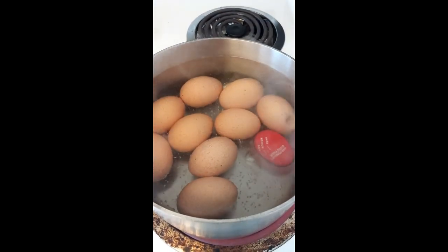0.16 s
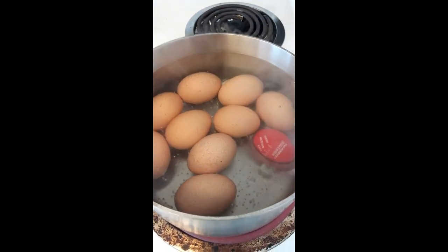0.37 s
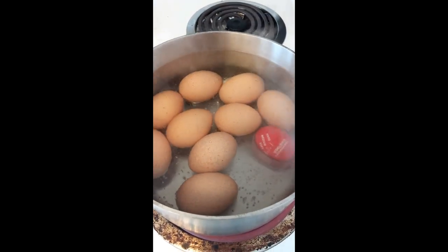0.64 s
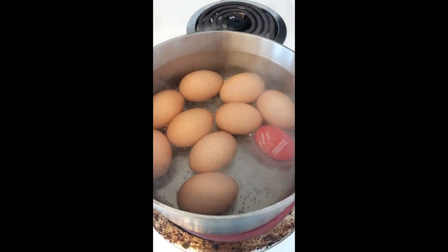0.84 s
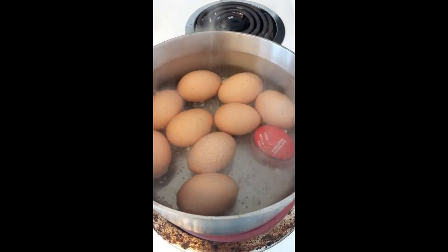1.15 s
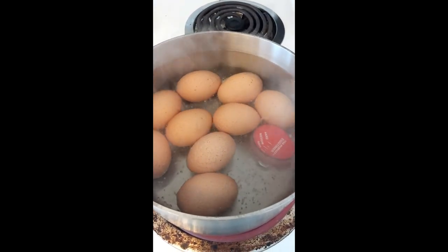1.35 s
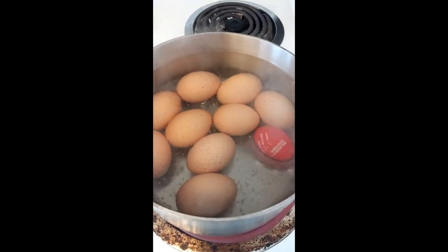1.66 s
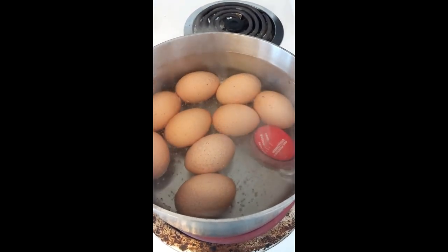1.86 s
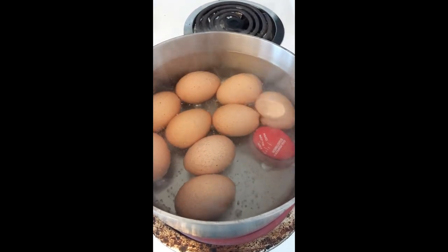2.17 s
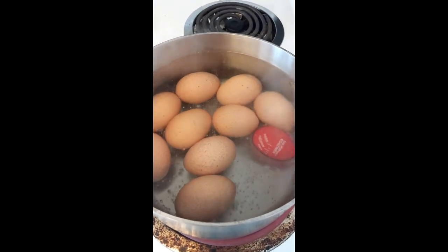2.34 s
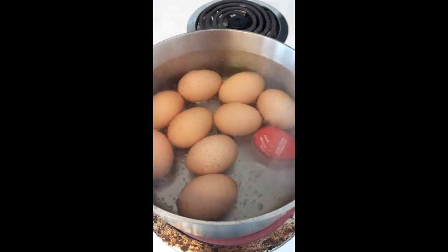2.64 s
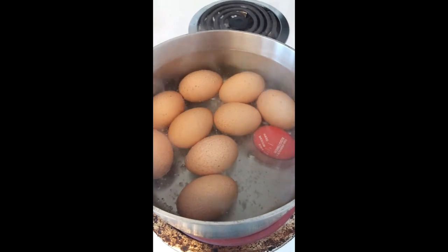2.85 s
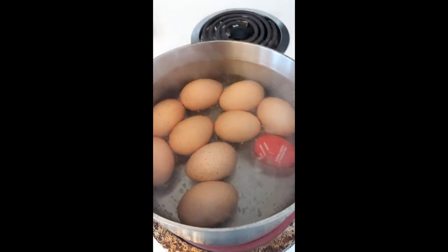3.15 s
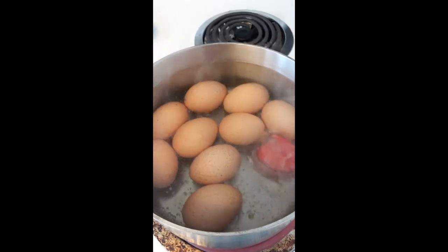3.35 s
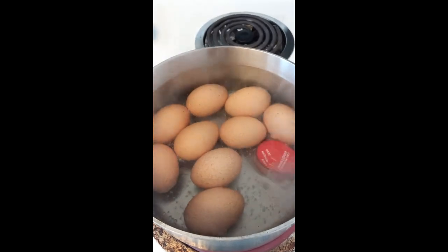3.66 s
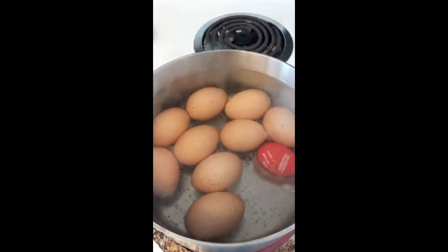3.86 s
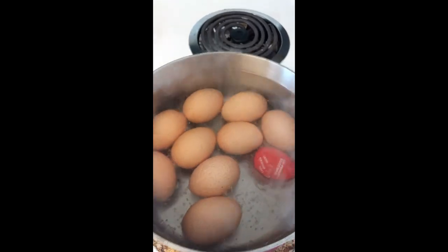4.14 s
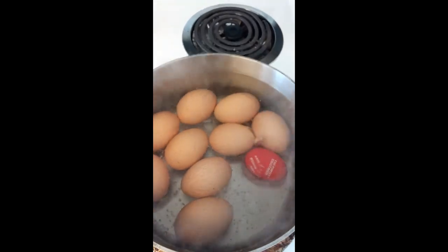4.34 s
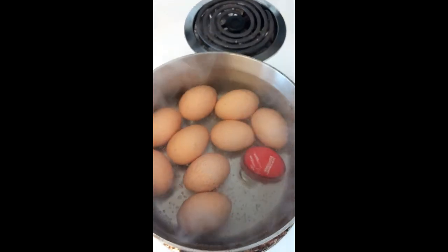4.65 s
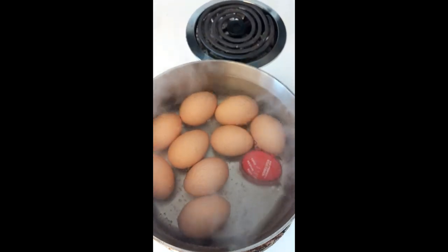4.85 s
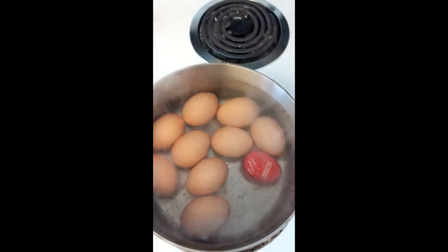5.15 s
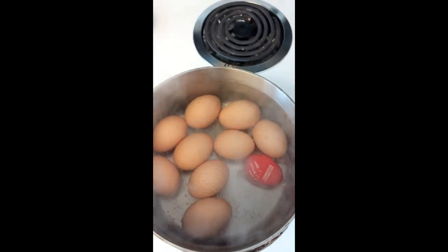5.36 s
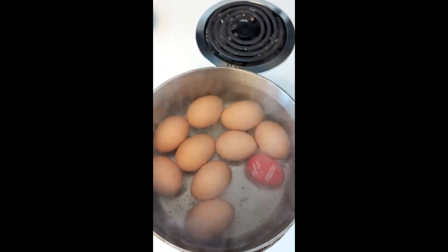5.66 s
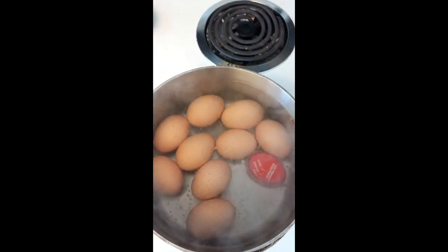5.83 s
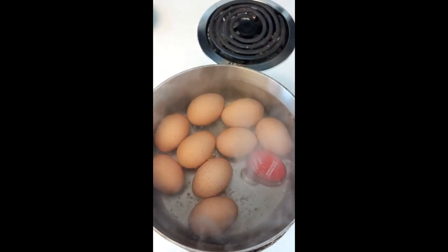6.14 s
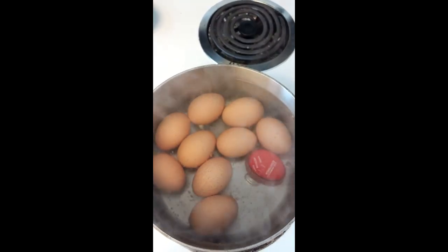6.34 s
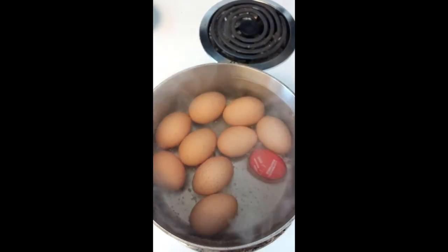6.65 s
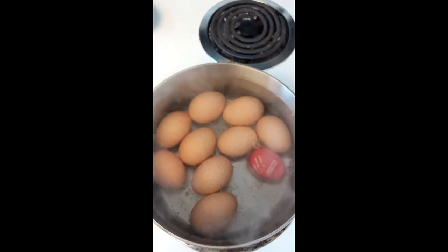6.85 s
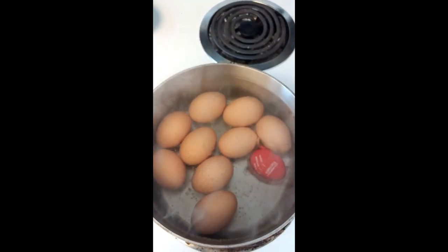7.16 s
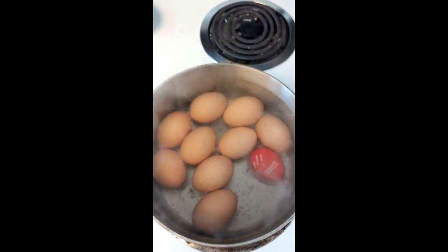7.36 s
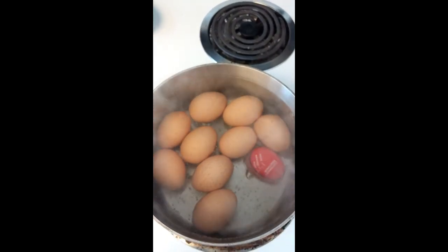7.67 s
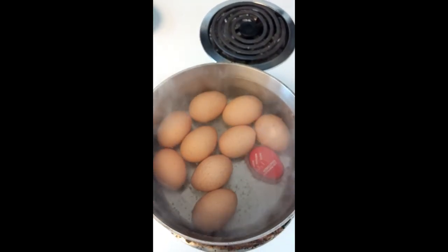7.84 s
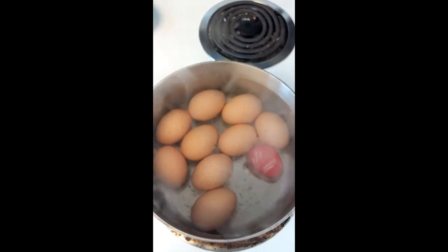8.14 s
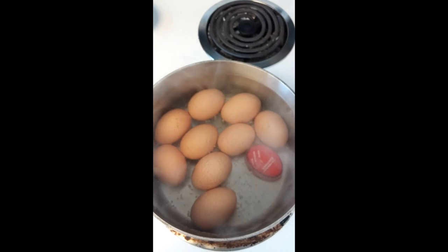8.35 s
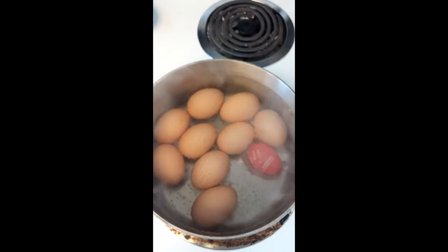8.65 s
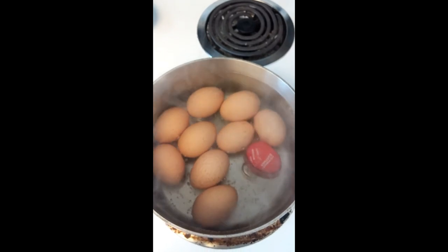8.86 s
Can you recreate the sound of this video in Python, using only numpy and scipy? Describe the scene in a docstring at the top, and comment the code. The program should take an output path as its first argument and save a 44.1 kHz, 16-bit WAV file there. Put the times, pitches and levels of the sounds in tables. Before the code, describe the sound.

Heard from just above the rim, near-simmering water murmurs and glugs softly while droplets spit and hiss on hot metal, ringing the thin pot wall. The first half is sparser and quieter. After a bright snap near the middle, the microphone lifts and the water shifts across the stereo picture. Stronger knocks, splashes, wet plips and irregular spits follow to the end, with short room reflections and quiet air noise.

```python
"""Water in a steel pot of eggs nears a simmer on an electric coil, heard from just above the rim.
Steam bubbles collapse on the bottom: pressure pushes ring the modes of the water-loaded pot, amid splashes and plips.
Water sizzles and spits on hot metal as dense random bursts and pings that ring the wall; a few drops snap sharply.
Halfway through, the microphone is lifted: the sizzle changes colour and the water swings across the stereo picture.
A small kitchen adds short reflections, filtered air noise and a steady hum."""
import sys
import numpy as np
from scipy import signal
from scipy.fft import rfft, irfft
from scipy.io import wavfile
from scipy.ndimage import uniform_filter1d, map_coordinates

SR = 44100
rng = np.random.default_rng(int(sys.argv[2]) if len(sys.argv) > 2 else 0)


def waveform_to_disk(signal):
    """Save audio, clipped to [-1, 1], as 16-bit WAV at the path in sys.argv[1]."""
    frames = np.transpose(np.atleast_2d(signal))
    scaled = np.clip(frames, -1, 1) * 32767
    samples = np.round(scaled).astype(np.int16)
    wavfile.write(sys.argv[1], SR, samples)


N = 396900
TIME = np.arange(N) / SR
LIFT_S = (4.24, 4.79)  # the microphone rises between these times
LIFTED = np.interp(TIME, LIFT_S, [0, 1])
KITCHEN_T60_S = 0.2

# Strength of the small collapses. Each row: time in seconds, relative level in dB.
SIMMER_LEVEL = [(0, -52), (0.6, -54.5), (2.3, -51.5), (3.8, -51.5), (4.1, -49.5), (4.8, -51), (5.2, -52.5),
                (5.7, -50.5), (6.55, -48.5), (6.85, -54), (7.7, -50.5), (8.4, -53.5), (9, -46.5)]
# Strength of the steady sizzle. Each row: time in seconds, relative level in dB.
SIZZLE_LEVEL = [(0, -53.5), (1.9, -57), (2.6, -54.5), (3.05, -59), (3.7, -53), (4.3, -62.5), (4.65, -58),
                (5.2, -64), (5.75, -67.5), (6.25, -50), (6.5, -59.5), (6.75, -58.5), (7.05, -58),
                (7.4, -52.5), (8.0, -60.5), (8.2, -67), (8.6, -51), (9, -59)]


def from_db(db):
    """Logarithmic level to amplitude ratio: 20 dB is a factor of ten."""
    return np.exp(np.asarray(db) * (np.log(10) / 20))


def rms_one(x):
    """Normalization by mean power: the average of the channels gets rms 1."""
    return x / np.sqrt(np.mean(np.atleast_2d(x).mean(axis=0) ** 2) + 1e-20)


def in_time(rows):
    """Linear interpolation of a (seconds, value) table at every sample."""
    return np.interp(TIME, *np.transpose(rows))


def filtered(x, order, hz, kind="low"):
    """Butterworth filtering: a maximally flat passband."""
    return signal.sosfilt(signal.butter(order, hz, kind, fs=SR, output="sos"), x)


def drift(corner_hz):
    """Low-passed noise: a double pole leaves slow random motion of rms 1."""
    step = 40  # samples between points of the slow curve
    r = np.exp(-2 * np.pi * corner_hz * step / SR)
    noise = rng.standard_normal(N // step + 2002)
    slow = signal.lfilter([1], [1, -2 * r, r * r], noise)[2000:]  # drop the filter's start-up
    return np.interp(np.arange(N) / step, np.arange(len(slow)), rms_one(slow))


def colour(x, points):
    """Minimum-phase filtering: the folded cepstrum of a (Hz, dB) curve gives a causal response."""
    size = 8192
    hz, db = np.transpose(points)
    bins_hz = np.arange(size // 2 + 1) * SR / size
    log_gain = np.log(from_db(np.interp(np.log(bins_hz + 1), np.log(hz), db)))
    cepstrum = irfft(log_gain)[:size // 2]
    cepstrum[1:] *= 2
    response = irfft(np.exp(rfft(cepstrum, size)))
    return signal.oaconvolve(np.atleast_2d(x), response[None], axes=1)[:, :N]


def resonate(x, hz, width_hz):
    """Damped resonance: a pole pair whose bandwidth sets the decay, with unit gain at the peak."""
    r = np.exp(-np.pi * width_hz / SR)
    poles = [1, -2 * r * np.cos(2 * np.pi * hz / SR), r * r]
    return signal.lfilter(np.array([1, 0, -1]) * (1 - r * r) / 2, poles, x + 1e-18)


def grains(per_s, spread_db):
    """Random point process: independent clicks with exponentially distributed levels and random signs."""
    sizes = from_db(spread_db * np.minimum(rng.exponential(1, N), 4)) * rng.choice([-1, 1], N)
    return sizes * (rng.random(N) < per_s / SR)


def linger(power, t60):
    """Exponential energy decay: each impulse of power dies away while its total is kept."""
    r = from_db(-120 / (t60 * SR))  # 60 dB of power
    return signal.lfilter([1 - r], [1, -r], power + 1e-18)


def swells(rows, rise_s, t60):
    """Power envelope of bursts (start s, level dB, length s): linear amplitude rise, hold, exponential decay."""
    power, t = np.zeros(N + SR), TIME[:SR // 4]
    for start, level_db, length in rows:
        at = max(round(start * SR), 0)
        decay_db = -60 * np.maximum(t - length, 0) / t60
        power[at:at + len(t)] += (from_db(level_db + decay_db) * np.minimum(t / rise_s, 1)) ** 2
    return power[:N]


def two_ports(shape, alike):
    """Interchannel coherence: shared and opposed white noise mixed for two ports."""
    mid, side = rng.standard_normal((2, *shape))
    alike = np.clip(alike, 0, 1)
    return np.stack([np.sqrt(1 + alike) * mid + sign * np.sqrt(1 - alike) * side for sign in (1, -1)])


def ports(x):
    """Acoustic shadowing: the microphone's body shades the left port from the treble."""
    # Each row: frequency in Hz, left minus right level in dB.
    shade = [(700, -9.5), (1500, -10), (2500, -8), (4000, -10.5), (5500, -14), (8400, -31), (11000, -23),
             (16000, -13)]
    left, right = x
    return np.vstack([colour(left, shade)[:, :len(right)], right])


def reflections(x, t60, alike_hz):
    """Diffuse reverberation: decaying noise of unit energy, more coherent between the ports in the bass."""
    t = np.arange(SR // 2) / SR
    mid, side = rng.standard_normal((2, len(t)))
    side = filtered(side, 1, alike_hz, "high")
    echoes = (mid + side * [[1], [-1]]) * from_db(-60 * t / t60) * (t > .001)
    echoes /= np.sqrt(np.mean(np.sum(echoes ** 2, axis=1)))
    return signal.oaconvolve(np.broadcast_to(x, (2, N)), echoes, axes=1)[:, :N]


def background():
    """Stationary noise, coherent in the bass, with a drifting sinusoidal mains hum."""
    # Each row: frequency in Hz, spectral level of the air noise in dB per Hz.
    air = [(20, -70), (45, 4.5), (62, -4), (85, -0.5), (130, 3.5), (300, 3), (700, -6), (1400, -22.5),
           (4000, -26), (9000, -29.5), (16000, -28)]
    air_db, hum_hz, hum_db = -60, 118.5, -67.5
    mid, side = rng.standard_normal((2, N))
    side = filtered(side, 1, 700, "high")
    hum = np.sqrt(2) * from_db(hum_db + 2 * drift(0.39)) * np.sin(2 * np.pi * hum_hz * TIME)
    return from_db(air_db) * rms_one(colour(mid + side * [[1], [-1]], air)) + hum


def snaps(tail_db, tail_t60):
    """Impulsive bursting: a drop makes a crack of band-shaped noise, and a modulated tail sputters round the pot."""
    # Each row: start in seconds, level in dB, length in seconds, pitch in Hz.
    drops = [(4.034, -23.5, 0.0018, 8800), (4.103, -39, 0.0049, 8600), (4.119, -51, 0.0086, 8500),
             (4.9532, -33, 0.0049, 7850), (8.04, -48, 0.0044, 8700)]
    # Each row: frequency as a multiple of the pitch, spectral level in dB per Hz.
    crack_colour = [(.093, 5), (.23, -14), (.52, -3.5), (.72, 6.5), (.87, 9.5), (1, 18.5), (1.16, 8),
                    (1.4, 1.5), (1.86, -4)]
    out, size = np.zeros((2, N)), SR // 4
    sputter = from_db(tail_db + 4 * drift(150)) ** 2
    for s, db, length, hz in drops:
        row, at = [(s, db, length)], round(s * SR)
        span = slice(at, at + size)
        power = swells(row, rise_s=0.0016, t60=.006)
        power = power + sputter * swells(row, rise_s=0.00081, t60=tail_t60)
        points = [(hz * multiple, level) for multiple, level in crack_colour]
        left, right = colour(two_ports((size,), alike=0.1), points)[:, :size]
        out[:, span] += np.sqrt(power[span]) * rms_one(ports([left, right]))
    return out


def ticks():
    """Shot noise at a low rate: separate tiny cracks of uneven size, with the top rolled off."""
    power = linger(grains(per_s=150, spread_db=2.5) ** 2, t60=.012)
    return rms_one(filtered(np.sqrt(power) * two_ports((N,), alike=.5), 1, 7500))


def pings(spread_db, patchy_db, count, size=640):
    """Bubble resonance: each tiny bubble swells and rings at its own pitch; higher ones die sooner."""
    when, pitch = rng.random((2, count))
    # smooth chance over time and pitch gathers like sizes into swarms
    swarms = map_coordinates(rng.standard_normal((300, 16)), [when * 299, pitch * 15], order=1)
    hz = 1100 * 13 ** pitch[:, None]
    rise_s = 0.002 * np.sqrt(3000 / hz)
    # large bubbles stand out singly, the smallest merge into an even hiss
    uneven = np.interp(hz, [4500, 9000], [1.3, .3])
    chance_db = spread_db * np.minimum(rng.standard_normal(count), 2) + patchy_db * swarms
    strength = from_db(uneven * chance_db[:, None]) * np.sqrt(hz / rise_s)
    t = TIME[:size].astype(np.float32)
    age = t / rise_s.astype(np.float32)
    rings = strength * (age * np.exp(-age) * np.sin((2 * np.pi * hz).astype(np.float32) * t))
    at = (when * N).astype(int)[:, None] + np.arange(size)
    return rms_one(np.bincount(at.ravel(), rings.ravel(), N + size)[:N])


def faint_spits(count=34):
    """Stratified random timing: small drops spit near the sizzle level of the moment."""
    s = (np.arange(count) + rng.random(count)) / count * (N - 1) / SR
    db = np.interp(s, *np.transpose(SIZZLE_LEVEL)) - 4 + 2 * rng.standard_normal(count)
    return [(at, level, 0.004) for at, level in zip(s, db)]


def sizzle(bubbles, bed_db, spit_db, fizz_db, flicker_db, wall_db, wall_wander_db):
    """Shot noise and wall resonance: tiny bubbles hiss, crowd into spits and follow each large collapse."""
    # Water spitting on hot metal. Each row: start in seconds, relative level in dB, length in seconds.
    spits = [(0.105, -49.5, 0.015), (0.3, -51, 0.0081), (0.324, -52.5, 0.0071), (0.52, -53, 0.0045),
             (0.562, -50, 0.0051), (0.645, -50.5, 0.015), (0.707, -50, 0.0067), (0.772, -54.5, 0.016),
             (0.891, -52, .005), (1.115, -53, 0.0098), (1.267, -42.5, 0.0043), (1.323, -50.5, 0.0068),
             (1.387, -51, 0.0063), (1.472, -51, 0.0057), (1.605, -56.5, 0.006), (1.688, -45, 0.0089),
             (1.762, -52, .005), (1.987, -52, .01), (2.016, -49.5, 0.004), (2.037, -50.5, 0.0055),
             (2.085, -53.5, .022), (2.247, -51, 0.0099), (2.495, -53.5, 0.018), (2.621, -54, .005),
             (2.648, -49, .005), (2.8, -50.5, .005), (2.834, -54, 0.0042), (2.391, -47, 0.0062),
             (2.738, -42.5, 0.0043), (3.17, -48, 0.014), (3.416, -45, 0.033), (3.578, -51.5, 0.0085),
             (3.626, -49.5, 0.015), (3.702, -46.5, 0.0067), (3.812, -48.5, 0.016), (3.971, -50.5, 0.019),
             (4.04, -51.5, 0.089), (4.33, -64.5, 0.026), (4.452, -59, 0.012), (4.605, -61, 0.056),
             (4.688, -56, 0.011), (4.822, -52, 0.03), (5.025, -52.5, 0.021), (5.346, -43.5, 0.0083),
             (5.422, -47.5, 0.0095), (5.475, -49, 0.0076), (5.84, -46.5, 0.051), (5.904, -34, 0.0048),
             (5.925, -50, 0.014), (6.135, -48, 0.015), (6.164, -40, 0.02), (6.614, -35, 0.018),
             (6.662, -45, 0.032), (6.808, -51, 0.0041), (7.128, -48, 0.011), (7.187, -47.5, 0.01),
             (7.26, -47, 0.0054), (7.29, -43, 0.007), (7.352, -50.5, 0.037), (7.404, -44, 0.026),
             (7.556, -49, 0.011), (7.604, -45, 0.038), (7.716, -33.5, 0.0047), (7.769, -54.5, 0.068),
             (8.146, -52.5, 0.024), (8.203, -52, 0.03), (8.262, -49, 0.038), (8.33, -53, 0.014),
             (8.625, -53, .01), (8.8, -48, 0.014), (8.856, -51, 0.015)]
    # Gain above about 7 kHz, which dips before the lift. Each row: time in seconds, gain in dB.
    treble_gain = [(0, 2.5), (1.4, 4.5), (2.6, 6), (3.0, -1), (3.8, -22), (4.1, -8), (4.8, 0.5),
                   (6.5, -7.5), (8.3, -4), (9, -14.5)]
    # Thin ringing of the steel wall. Each row: frequency in Hz, width in Hz, relative level in dB.
    wall_modes = [(2132, 39, 10), (3440, 160, 0), (3793, 61, 3.5), (4010, 60, -4.5), (5980, 140, 4),
                  (7310, 34, -24), (8146, 59, 2), (7950, 62, 6), (8450, 24, 4), (8760, 45, -3)]
    # Colour with the microphone low, then lifted. Each row: frequency in Hz, spectral level in dB per Hz.
    low_colour = [(700, 2), (1350, -16), (1650, -8.5), (1820, 3.5), (2100, -5), (2500, 1), (3000, -13),
                  (3600, -1.5), (4200, -14.5), (5100, -4), (6500, -11), (8500, 2), (11500, -18),
                  (16000, -17.5)]
    high_colour = [(600, 1), (1100, 8.5), (1600, -12), (2200, -4.5), (3000, -13), (3800, -1.5),
                   (4500, -8.5), (5600, -5), (7000, 1.5), (8400, 6), (10300, -6), (13000, -8.5),
                   (16000, -17)]

    clumps = linger(linger(grains(per_s=460, spread_db=7.0) ** 2, t60=0.06), t60=0.022)
    clumps = rms_one(np.sqrt(clumps))
    bed = from_db(in_time(SIZZLE_LEVEL) + bed_db + flicker_db * drift(37.0)) ** 2
    bed = bed * (0.47 + 0.082 * clumps ** 2)
    power = bed + from_db(spit_db) ** 2 * swells([*spits, *faint_spits()], rise_s=0.0049, t60=0.077)
    fizz = [(s - .003, db + fizz_db, .004) for s, db, tilt in bubbles]
    power = power + swells(fizz, rise_s=0.0044, t60=0.11)
    calm = bed / power  # 1 in the steady sizzle, near 0 in a strong spit

    burst = linger(grains(per_s=6500, spread_db=-7.0) ** 2, t60=0.015)  # each tiny burst rattles briefly
    hiss = rms_one(np.sqrt(burst) * two_ports((N,), alike=0.01))
    tick_share = .25  # of the power
    hiss = np.sqrt(1 - tick_share) * hiss + np.sqrt(tick_share) * ticks()
    ping_share = .3 + .07 * calm
    ringing_bubbles = pings(spread_db=2.0, patchy_db=4.5, count=8000)
    crackle = np.sqrt(1 - ping_share) * hiss + np.sqrt(ping_share) * ringing_bubbles

    top = filtered(crackle, 1, 7000, "high")
    middle = filtered(crackle, 1, [2200, 6500], "band")
    middle_db = 5 - 7.5 * calm  # spits hold larger bubbles than the steady sizzle
    crackle = crackle + (from_db(in_time(treble_gain)) - 1) * top + (from_db(middle_db) - 1) * middle

    low = rms_one(ports(colour(crackle, low_colour)))
    knocks = crackle * from_db(-7 * calm)  # the steady sizzle strikes the wall less
    ringing = 0
    for hz, width, db in wall_modes:
        # the strength of each mode wanders as the spits move about
        wander_db = wall_wander_db * np.minimum(drift(12.0), 1.5)
        ringing = ringing + from_db(db + wall_db + wander_db) * resonate(knocks, hz, width)
    high = rms_one(ports(colour(crackle + ringing, high_colour)))
    return np.sqrt(power) * (np.sqrt(1 - LIFTED) * low + np.sqrt(LIFTED) * high)


def plips(t60, glide, beat_db):
    """Beating bubble resonances: a surfacing bubble splits into halves of close, slightly rising pitch."""
    # Each row: start in seconds, relative level in dB, starting pitch in Hz.
    surfacing = [(5.351, -44, 1700), (5.438, -40.5, 1680), (5.555, -41, 1480), (5.609, -51, 1420),
                 (5.69, -53, 1540), (6.961, -38, 1760), (7.93, -50, 1700), (8.028, -55, 1480),
                 (8.159, -52, 1520), (8.333, -43, 1760), (8.62, -50, 1730), (8.867, -36, 1705),
                 (8.938, -52, 1600)]
    out, t = np.zeros(N + SR), TIME[:SR // 10]
    for (s, db, hz), split in zip(surfacing, rng.uniform(0.885, 0.99, len(surfacing))):
        phase, at = 2 * np.pi * hz * t * (1 + glide * t / t60), round(s * SR)
        envelope = from_db(db - 60 * t / t60) * (1 - np.exp(-t * hz / 2))
        out[at:at + len(t)] += envelope * (np.sin(phase) + from_db(beat_db) * np.sin(split * phase))
    return out[:N] * from_db([[-3], [1.5]])


def splashes(bubbles, level_db, hold_s, t60, lifted_db):
    """Turbulent noise: each collapse churns the surface into a rough, unpitched splash, altered by the lift."""
    # Each row: frequency in Hz, spectral level in dB per Hz.
    splash_colour = [(400, -17), (680, -1), (950, -3.5), (1300, -13.5), (1700, -13.5), (2100, -16),
                     (2650, -10), (3300, -15), (4300, -24), (8000, -23.5)]
    rows = [(s - .002, db + level_db + np.interp(s, LIFT_S, [0, lifted_db]), hold_s)
            for s, db, tilt in bubbles]
    power = swells(rows, rise_s=0.0057, t60=t60)
    per_s = 900
    roughness = linger(grains(per_s, spread_db=2.5) ** 2, t60=0.019) * SR / per_s
    churn = np.sqrt(power * roughness)
    return colour(churn * two_ports((N,), alike=0.26), splash_colour) * from_db([[-3], [1]])


def pot_body(push, softness_hz, tilt_db=0, place=0):
    """Modal superposition: pressure rings the filled pot; neighbours in opposite phase build up softly."""
    # Modes of the filled pot. Each row: frequency in Hz, width in Hz, relative level in dB.
    pot_modes = [(65, 27, -25.5), (120.35, 18, -11), (166.6, 32, -10), (240.2, 38, -8.5), (290, 29, -10.5),
                 (338.1, 32, -9), (425.5, 31, 1), (478.3, 39, 2.5), (619, 40, -11), (807, 62, -21),
                 (931.2, 70, -10.5), (1113, 46, -18.5), (1408, 170, -36), (1760, 92, -19.5)]
    # Uneven excitation from the place of impact. Each row: frequency in Hz, spread in dB.
    place_spread = [(200, 0), (300, 2.5), (630, 2.5), (820, 0)]
    chance = place * np.clip(rng.standard_normal((len(pot_modes), *np.shape(tilt_db))), -1, 1)
    rings = 0
    for k, (hz, width, db) in enumerate(pot_modes):
        place_db = chance[k] * np.interp(hz, *np.transpose(place_spread))
        bright_db = tilt_db * np.clip(np.log2(hz / 450), -.15, 1.2)
        rings = rings + (-1) ** k * from_db(db + place_db + bright_db) * resonate(push, hz, width)
    return filtered(rings, 2, softness_hz)


def simmer(level_db, per_s, gurgle_db, count=14):
    """Random modal excitation: small collapses make the pot murmur, and loose bubbles gurgle at own pitches."""
    push = np.sqrt(linger(grains(per_s, spread_db=1.5) ** 2, t60=0.022)) * two_ports((N,), alike=1.0)
    clicks, dealt = grains(per_s=100, spread_db=4.5), rng.integers(0, count, N)
    gurgle = sum(resonate(clicks * (dealt == k), hz, hz / 10) / hz ** 0.85
                 for k, hz in enumerate(np.geomspace(200, 700, count)))
    murmur = rms_one(pot_body(push, softness_hz=1480))
    return from_db(in_time(SIMMER_LEVEL) + level_db) * (murmur + from_db(gurgle_db) * rms_one(gurgle))


def collapses(count=30):
    """Clustered event process: large collapses in glugs and alone, as (s, level dB, tilt dB per octave)."""
    # Glugs, quick runs of large bubbles collapsing; length 0 is a single one.
    # Each row: start in seconds, length in seconds, relative level in dB, relative brightness in dB per octave.
    glugs = [(0.02, 0.0, -44, -5), (0.079, 0.018, -44.5, -4), (0.136, 0.0, -47.5, 3), (0.341, 0.0, -42, -1),
             (0.717, 0.0, -50, 0), (0.918, 0.015, -44.5, -4), (1.127, 0.04, -48, -26),
             (1.321, 0.017, -41.5, -3), (1.466, 0.015, -47, 1), (1.651, 0.02, -43.5, -3),
             (1.827, 0.0, -44.5, -11), (1.862, 0.0, -44, -0.5), (1.997, 0.0, -42.5, -17),
             (2.088, 0.0, -47, -9), (2.115, 0.0, -45, -6), (2.271, 0.015, -45, 1), (2.399, 0.0, -36, -5),
             (2.502, 0.021, -35, -3.5), (2.58, 0.018, -45, -8), (2.667, 0.0, -48, 7),
             (2.929, 0.02, -42.5, -7), (3.024, 0.022, -41, -5.5), (3.331, 0.03, -52.5, -16),
             (3.419, 0.013, -33, 2), (3.585, 0.014, -35.5, -1.5), (3.727, 0.0, -40.5, -4),
             (3.843, 0.0, -41.5, -2), (4.042, 0.075, -43.5, 3.5), (4.232, 0.02, -48.5, -6),
             (4.301, 0.0, -51, 0), (4.39, 0.0, -45, -11), (4.462, 0.04, -54.5, -3), (4.327, 0.0, -39.5, 0),
             (4.609, 0.0, -32, -4), (4.627, 0.0, -37, 1), (4.662, 0.0, -39.5, 5), (4.83, 0.0, -35.5, -0.5),
             (4.848, 0.016, -35, 0), (4.969, 0.015, -41, 4), (5.031, 0.024, -36, 0.5),
             (5.118, 0.024, -33.5, -2), (5.166, 0.0, -33, -9), (5.187, 0.015, -33.5, -1.5),
             (5.227, 0.022, -40, 5.5), (5.28, 0.0, -44, -10), (5.33, 0.0, -31.5, 3), (5.348, 0.02, -40, 5),
             (5.434, 0.018, -33.0, -1), (5.471, 0.02, -40.5, 0.5), (5.515, 0.0, -54, 0),
             (5.552, 0.018, -33.5, 0.5), (5.593, 0.04, -41, 3), (5.85, 0.032, -37, -0.5),
             (5.927, 0.0, -32.5, -0.5), (5.975, 0.02, -45.5, 1), (6.067, 0.014, -33, -2.5),
             (6.099, 0.0, -37, 4), (6.123, 0.0, -33, 1), (6.158, 0.0, -33.5, -2), (6.187, 0.025, -49, 2),
             (6.257, 0.015, -45.5, 0), (6.395, 0.02, -54, 6), (6.46, 0.0, -50, 8), (6.56, 0.0, -41, -2.5),
             (6.619, 0.02, -35.5, -14), (6.678, 0.02, -38, 1), (6.961, 0.015, -31.5, -0.5),
             (7.081, 0.0, -41.5, -3), (7.19, 0.0, -45, 3.5), (7.275, 0.024, -47.5, 0),
             (7.357, 0.022, -30.5, -1), (7.412, 0.03, -44.5, -2), (7.487, 0.02, -36.5, 2.5),
             (7.632, 0.012, -39, 2), (7.777, 0.02, -32.5, -6.5), (7.848, 0.0, -42, 8),
             (7.924, 0.026, -42, -1.5), (8.002, 0.0, -46, 6.5), (8.151, 0.017, -34.5, -1.5),
             (8.325, 0.015, -40, 4), (8.662, 0.0, -41, -4), (8.816, 0.0, -41.5, 1.5),
             (8.85, 0.0, -36, -3.5), (8.876, 0.0, -31.5, -0.5), (8.933, 0.015, -45.5, 1)]
    gap_s, jitter_s = .02, 0.00118  # a loose beat
    sag_db_per_s, uneven_db = 24, 1  # collapses weaken as the steam is spent
    lone = (np.arange(count) + rng.random(count)) / count * N / SR
    lone_db = np.interp(lone, *np.transpose(SIMMER_LEVEL)) + 4
    runs = [(s, age, db, bright) for s, length, db, bright in glugs
            for age in np.linspace(0, length, 1 + round(length / gap_s))]
    start, age, db, bright = np.transpose(runs)
    late, uneven = rng.standard_normal((2, len(start)))
    s = np.append(lone, start + age + jitter_s * late * (age > 0))
    db = np.append(lone_db, db - sag_db_per_s * age + uneven_db * uneven)
    return np.column_stack([s, db, -2.5 + np.append(np.zeros(count), bright)])


def thumps(bubbles, level_db, ragged_db, collapse_s, slosh_db, slosh_t60):
    """Cavity collapse: an imploding bubble gives a short ragged push, water sloshes after it, and the pot rings."""
    s, db, tilt = bubbles.T
    t = TIME[:SR // 12]
    ragged = from_db(ragged_db) * t / collapse_s * np.exp(1 - t / collapse_s)
    slosh = from_db(slosh_db - 60 * t / slosh_t60) * np.minimum(t / collapse_s, 1)
    implosion = np.exp(-((t - collapse_s) / .00012) ** 2)
    push = implosion + two_ports((len(s), len(t)), alike=0.97) * (ragged + slosh)
    tilt = tilt + np.interp(s, LIFT_S, [-.5, .5])  # slightly brighter once lifted
    rings = pot_body(push, softness_hz=1600, tilt_db=tilt[:, None], place=0.99)
    # each thump is scaled by its peak short-time power, and that peak falls on the event time
    power = uniform_filter1d(rings.mean(axis=0) ** 2, size=200, axis=1)
    rings = rings / np.sqrt(power.max(axis=1))[:, None]
    rings *= from_db(db + level_db)[:, None]
    out = np.zeros((2, N + 2 * len(t)))
    starts = np.round(s * SR).astype(int) - power.argmax(axis=1) + len(t)
    for k, start in enumerate(starts):
        out[:, start:start + len(t)] += rings[:, k]
    return out[:, len(t):len(t) + N]


def aim(water):
    """Interaural-style level differences by frequency: the water swings across as the microphone is lifted."""
    # Balance with the microphone low, then lifted. Each row: frequency in Hz, left minus right level in dB.
    side_low = [(150, 2.5), (300, 2.5), (450, 0.5), (850, 15.5), (1200, 9.5), (1800, 3.5)]
    side_high = [(150, 1.5), (300, 4.5), (450, 0.5), (850, -1.5), (1200, -14), (1800, -0.5)]
    spectrum = rfft(water)
    hz = np.arange(spectrum.shape[1]) * SR / N
    low, high = (irfft(spectrum * from_db(np.interp(hz, *np.transpose(side)) * [[.5], [-.5]]), N)
                 for side in (side_low, side_high))
    return (1 - LIFTED) * low + LIFTED * high


def scene():
    """Superposition and arrival delay: water and sizzle with kitchen reflections reach the right port first."""
    bubbles = collapses()
    water = thumps(bubbles, level_db=1.5, ragged_db=-6.5, collapse_s=.002, slosh_db=-13.0, slosh_t60=0.12)
    water = water + simmer(level_db=-3, per_s=150, gurgle_db=-3.5)
    water = water * from_db([[-.8], [.6]]) + plips(t60=0.044, glide=0.012, beat_db=-7.0)
    water = water + splashes(bubbles, level_db=-10.0, hold_s=0.0077, t60=0.098, lifted_db=2.5)
    water = aim(water + from_db(-5.0) * reflections(water, KITCHEN_T60_S, alike_hz=740))

    sizzling = sizzle(bubbles, bed_db=-0.5, spit_db=-2.0, fizz_db=-21.0, flicker_db=2.0,
                      wall_db=-2.0, wall_wander_db=2.0)
    snapping = snaps(tail_db=-11, tail_t60=0.05)
    sent = from_db(-5.5) * sizzling + from_db(-6) * snapping
    treble = sizzling + snapping + reflections(sent, KITCHEN_T60_S, alike_hz=597)

    left, right = water + filtered(treble, 2, 450, "high")  # tiny bursts carry little bass
    lag = round(.0002 * SR)  # 0.2 ms between the ports
    return np.stack([np.pad(left, (lag, 0))[:N], right]) + background()


def record(dry):
    """Band limiting: a gentle high-pass cuts the deepest bass and a steep elliptic low-pass the top."""
    lean = filtered(dry, 2, 45, "high")
    return signal.sosfilt(signal.ellip(10, .1, 70, 15900, fs=SR, output="sos"), lean)


dry = scene()
out = record(dry)
waveform_to_disk(out)
```